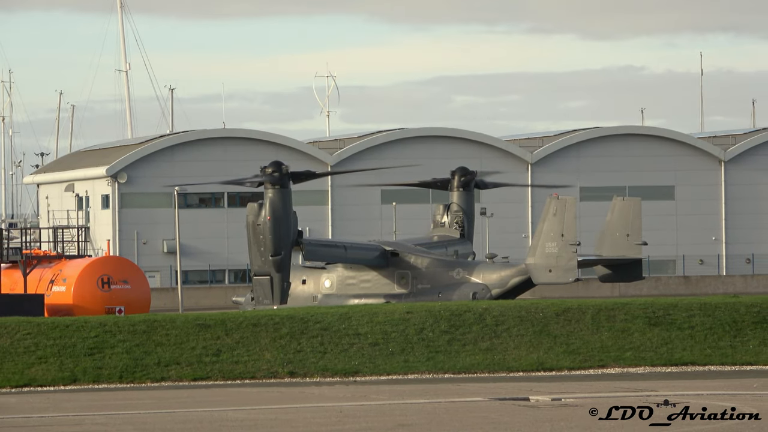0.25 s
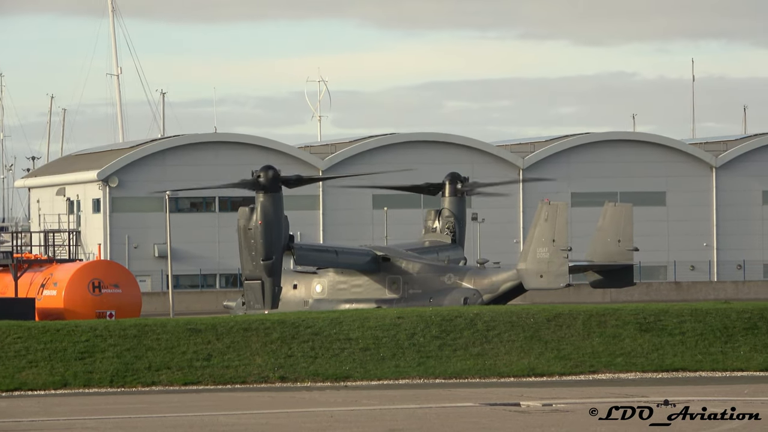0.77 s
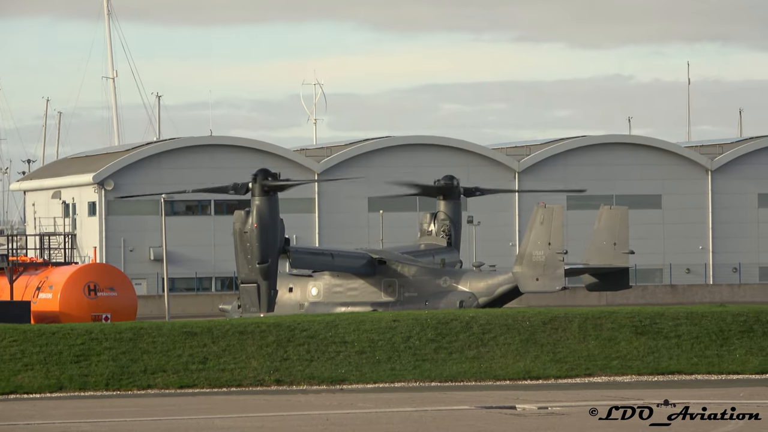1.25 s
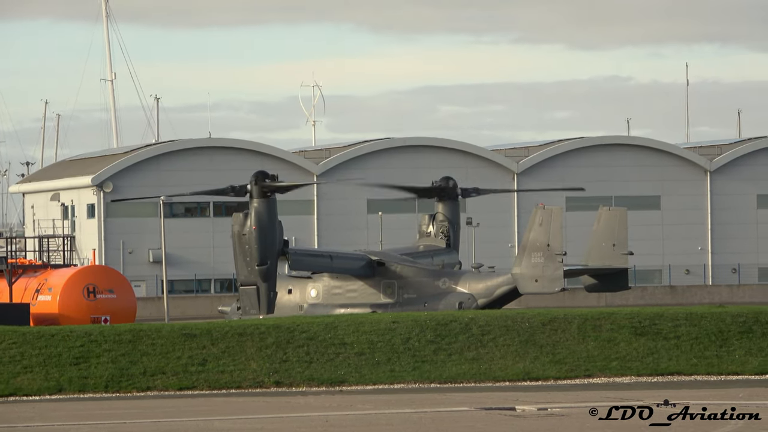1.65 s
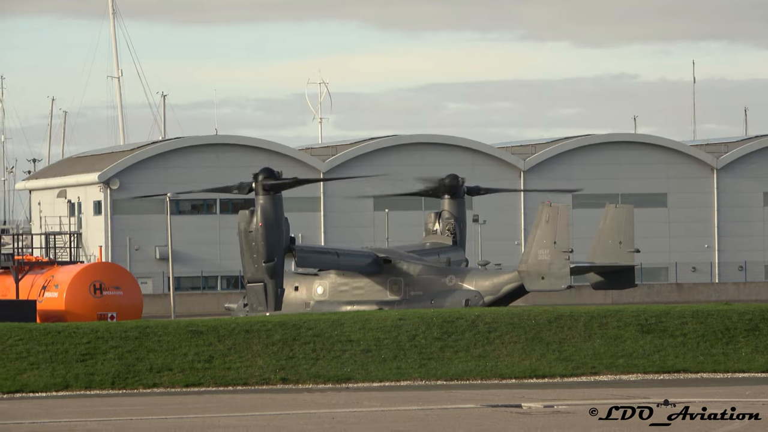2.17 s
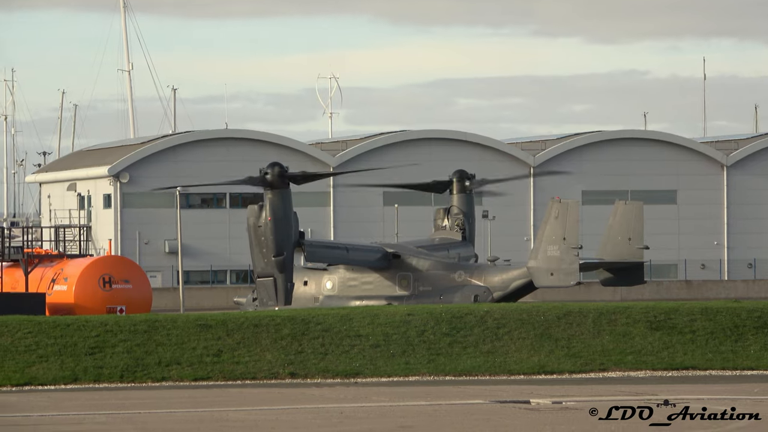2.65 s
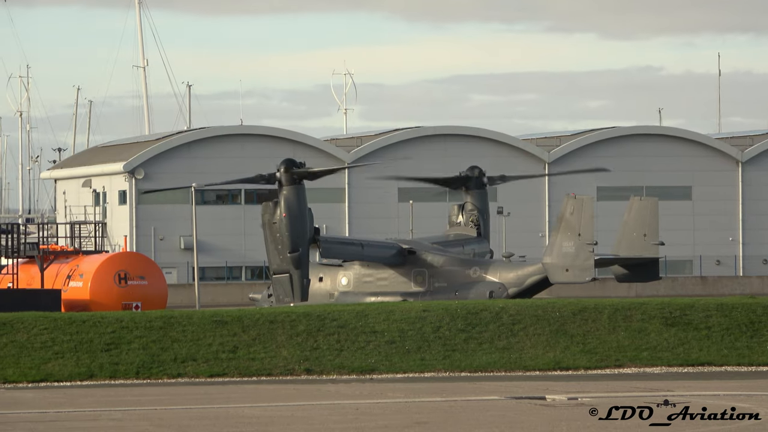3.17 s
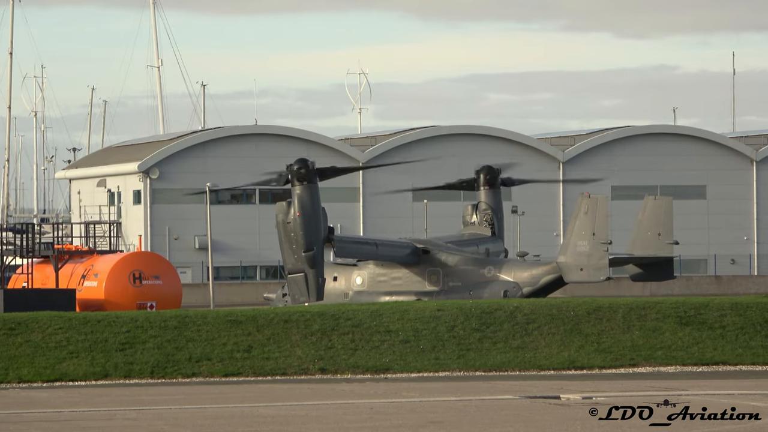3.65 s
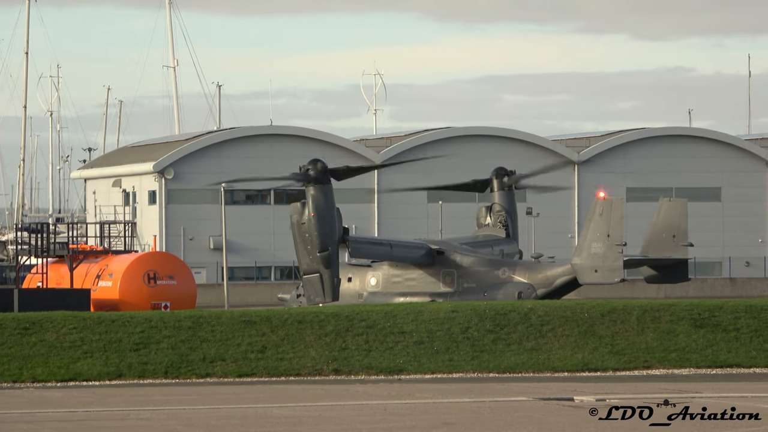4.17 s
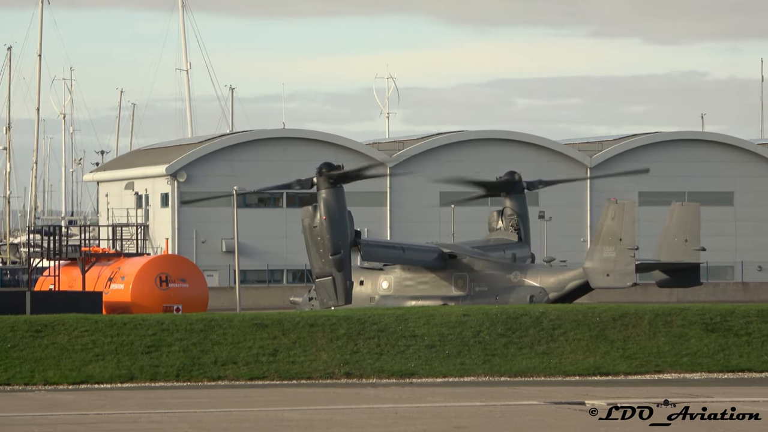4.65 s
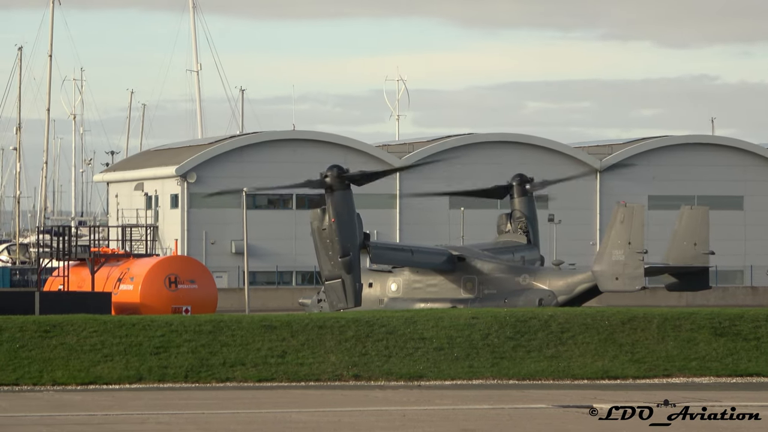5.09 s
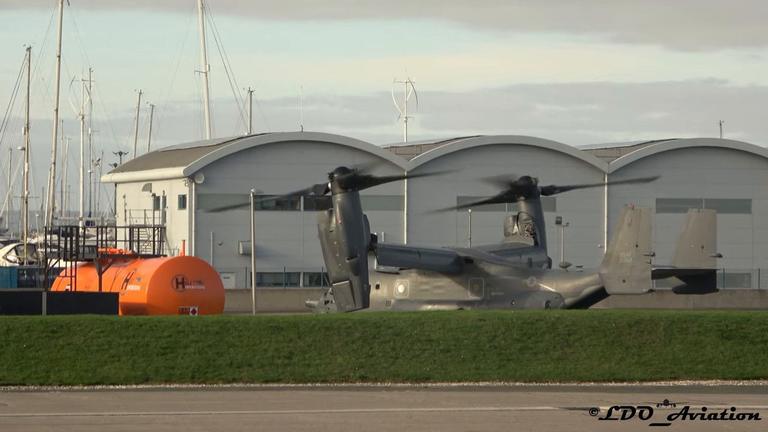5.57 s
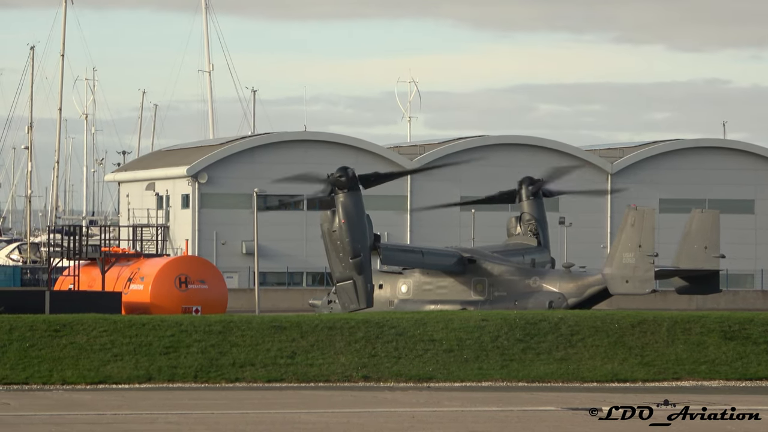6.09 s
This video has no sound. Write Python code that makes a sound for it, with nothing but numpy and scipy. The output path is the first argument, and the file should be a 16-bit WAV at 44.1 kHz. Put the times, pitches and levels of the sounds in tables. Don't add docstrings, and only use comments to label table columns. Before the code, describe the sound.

A tiltrotor idles on the ground outdoors, heard across grass for about six seconds without starting or stopping. Two rotors beat rapidly, about twenty slaps a second each, interleaved into a rough, fluttering chop with low thumps and a papery midrange edge. Beneath are a steady broad turbine roar and a faint, smeared high whine that pulses with the blades. Hard snaps stand out near 0.8 to 1 second, then strongly from 2.2 to 3.1, when the slapping is heaviest. From about 4 to 5 seconds the chop is softer, with a few snaps around 4.4. Around 5.4 to 5.8 sharp slaps return with short, bright tearing hisses. Low wind gusts buffet the microphone throughout, heaviest at 3.1 to 3.6 and 5.1 to 5.5, mostly left, with overloaded thuds. The aircraft stays nearly centred, with slight ground and building reflections.

```python
import sys
import numpy as np
from scipy import signal
from scipy.fft import rfft, irfft
from scipy.io import wavfile
from scipy.ndimage import uniform_filter1d

SR = 44100
rng = np.random.default_rng(int(sys.argv[2]) if len(sys.argv) > 2 else 0)


def put_to_file(sound):
    columns = np.atleast_2d(sound).T
    safe = np.clip(columns, -1, 1)
    whole_steps = np.round(safe * 32767)
    wavfile.write(sys.argv[1], SR, whole_steps.astype(np.int16))


def amplitude_ratio(level_db):
    exponent = np.asarray(level_db, float) / 20
    return 10 ** exponent


N = 278712
BLADE_HZ = 19.7
ROWS = N // 2000 + 2


def noise():
    return rng.standard_normal(N)


def curves(table):
    s, *columns = np.transpose(table)
    return [np.interp(np.arange(N) / SR, s, c) for c in columns]


def colour(x, points, unit=True):
    hz, db = np.transpose(points)
    f = np.arange(N // 2 + 1) * SR / N + 1
    gain = amplitude_ratio(np.interp(np.log(f), np.log(hz), db))
    y = irfft(rfft(x) * gain, N)
    return y / np.std(y) if unit else y


def walk(rate):
    k = int(SR / rate)
    held = np.repeat(rng.standard_normal(N // k + 1), k)
    y = uniform_filter1d(uniform_filter1d(held, k), k)[:N]
    return y / np.std(y)


def steady(x, over_ms, share):
    power = uniform_filter1d(x ** 2, int(over_ms * SR / 1000)) + .05
    y = x / power ** (np.clip(share, 0, 1) / 2)
    return y / np.std(y)


def burst(since_ms, rise_ms, fall_ms):
    return 2 / (np.exp(-since_ms / rise_ms) + np.exp(since_ms / fall_ms))


def wake(memory):
    rows = rng.standard_normal((ROWS, round(SR / BLADE_HZ)))
    return signal.lfilter([1], [1, -np.clip(memory, 0, .95)], rows, axis=0).ravel()[:N]


# (frequency [Hz], level [dB])
CHOP_TONE = [(300, -2), (500, -1), (750, 3.5), (1100, 1), (1500, -4), (2200, -59)]
CRACK_TONE = [(1000, -20), (1600, 13), (2500, 2.5), (4000, 1), (6500, -21), (9000, -34), (12000, -62)]
BODY_TONE = [(60, -31), (120, 13), (200, 5), (300, 12.5), (420, 6.5), (600, -15), (1000, -61)]
THUMP_TONE = [(10, -16), (25, -17), (60, -7.5), (85, 3), (100, -0.5), (140, -6), (180, -2), (230, -16.5),
              (400, -21.5), (800, -60), (2000, -88)]


def rotor(place_ms, slap_db, crack_db, body_db, thump_ms, thump_db):
    turns = np.arange(N) / SR * BLADE_HZ + .5
    blade = np.floor(turns - place_ms * BLADE_HZ / 1000).astype(int)
    since = 1000 * (turns - .5 - blade) / BLADE_HZ - place_ms
    late, size, bright, deep = rng.standard_normal((ROWS, 4))[blade].T

    rough = np.tanh(0.5 * colour(wake(memory=0.29), CHOP_TONE)) / .5
    slap = burst(since - 1.6 * late, rise_ms=4.34, fall_ms=2.64) * rough
    crack = burst(since - late, rise_ms=1.6, fall_ms=2.2) * colour(noise(), CRACK_TONE)
    crack = amplitude_ratio(crack_db + 0.58 * bright) * crack
    body = burst(since - 2.2, rise_ms=8.8, fall_ms=8.45) * colour(wake(memory=0.76), BODY_TONE)
    body = amplitude_ratio(body_db + 1.35 * deep + 2) * body

    pushes = np.diff(np.floor(turns - .5 - thump_ms * BLADE_HZ / 1000), prepend=0)
    thump = amplitude_ratio(thump_db + 0.58 * walk(rate=1.02)) * colour(pushes, THUMP_TONE)
    sound = amplitude_ratio(slap_db - 2) * (amplitude_ratio(0.77 * size) * (slap + crack) + body) + thump
    return sound, burst(since, rise_ms=3.6, fall_ms=2.3) * amplitude_ratio(2.9 * size)


# (time [s], slap level [dB], far rotor over near rotor [dB])
LOADING = [(0, -18, -9), (.4, -18, 8), (.8, -15, -9), (1.2, -18, -13), (1.45, -18, -6), (1.8, -16.5, -3),
           (2.05, -14.5, -5), (2.43, -17, -2), (2.65, -14, 20), (3.1, -18, 16), (3.45, -18, 4.5),
           (4.0, -19.5, 23), (4.3, -20.5, 3), (4.66, -23.5, 8), (4.9, -23.5, 5), (5.2, -22, 14),
           (5.8, -22.5, 2.5), (6.32, -20.5, -3)]
# (time [s], level [dB])
VORTEX_CRACK = [(0, -30), (.6, -25.5), (1.2, -30), (1.5, -38), (2.1, -27.5), (2.6, -21.5), (3, -21.5),
                (3.5, -26), (4.1, -25), (4.6, -22.5), (5.1, -31), (5.5, -23), (6.32, -29)]
# (time [s], level [dB])
THRUST_BODY = [(0, -19.5), (.7, -23), (1.3, -20), (1.65, -27.5), (2.25, -20.5), (2.6, -25.5), (3.05, -22),
               (3.6, -26.5), (4.1, -30), (4.45, -23), (5, -25), (5.6, -28), (6.15, -21.5), (6.32, -25)]


def loading():
    slap_db, far_over_db = curves(LOADING)
    near_db = slap_db - 10 * np.log10(1 + amplitude_ratio(far_over_db) ** 2)
    crack_db = curves(VORTEX_CRACK)[0] - slap_db
    body_db = curves(THRUST_BODY)[0] - slap_db
    return near_db, near_db + far_over_db, crack_db, body_db


# (time [s], peak level [dB])
HARD_SLAPS = [(0.768, -13.5), (0.867, -24), (0.969, -24), (1.069, -22), (1.527, -29), (1.577, -27),
              (1.677, -17), (1.83, -19), (2.086, -23), (2.19, -18.5), (2.238, -20), (2.288, -14),
              (2.388, -12.5), (2.49, -14), (2.905, -35), (2.957, -11), (3.057, -13), (3.41, -15),
              (3.673, -18.5), (3.721, -20), (3.827, -23), (4.378, -16), (4.429, -28), (5.087, -40),
              (5.247, -39), (5.448, -15.5), (5.499, -13), (5.545, -18), (5.65, -19.5), (5.8, -20)]
# (frequency [Hz], level [dB])
SNAP_TONE = [(300, -20), (600, -6.5), (1100, 9.5), (1800, -2.5), (3000, -4), (6000, -14), (9000, -45),
             (12000, -70)]


def hard_slaps():
    since = 1000 * np.arange(-200, 800) / SR
    swell = burst(since - 1.2, rise_ms=0.99, fall_ms=1.7)
    shape, spikes = np.zeros(N + 1000), np.zeros(N)
    for s, db in HARD_SLAPS:
        start = int(s * SR) - 200
        shape[start:start + 1000] += amplitude_ratio(db - 4.5) * swell
        spikes[int((s + .0012) * SR)] = amplitude_ratio(db - 32)
    ragged = shape[:N] * steady(colour(noise(), SNAP_TONE), over_ms=4, share=.7)
    spike = colour(signal.unit_impulse(N, "mid"), SNAP_TONE)[N // 2 - 300:N // 2 + 301]
    return ragged + signal.fftconvolve(spikes, spike / spike.max(), "same")


# (frequency [Hz], level [dB])
TIP_TONE = [(1500, -22), (3000, 4), (4500, 0), (6500, -3), (8500, -20), (11000, -34)]


def tip_tears():
    from_s, first_db, grow_db, count = 5.348, -24.5, 0.37, 9.8
    blade = np.arange(count)
    since = 1000 * (np.arange(N) / SR - from_s - blade[:, None] / BLADE_HZ)
    swells = burst(np.clip(since - 2.5, -60, 60), rise_ms=1.9, fall_ms=1.8)
    shape = amplitude_ratio(first_db - 6 + grow_db * blade) @ swells
    return shape * steady(colour(noise(), TIP_TONE), over_ms=4, share=.6)


# (time [s], roar level [dB], whine level [dB])
TURBINE_LEVELS = [(0, -35, -53), (.8, -34.5, -54), (1.3, -36, -48), (2.25, -37, -61), (2.6, -34.5, -47.5),
                  (3.3, -36.2, -49), (3.7, -38.5, -60), (4.1, -36.5, -49.5), (5.3, -38, -47),
                  (5.6, -39, -52.5), (6.32, -39.8, -50.5)]
# (frequency [Hz], level [dB])
ROAR_TONE = [(20, -30), (60, -10), (150, 2.5), (400, 11), (1000, 8.5), (2000, 1.5), (3500, 1.5),
             (5000, -0.5), (6500, -6), (8000, -11.5), (9500, -22.5), (11000, -28.5), (13000, -37)]


def turbines(chop):
    roar_db, whine_db = curves(TURBINE_LEVELS)
    roar = (1 + 0.27 * chop) * amplitude_ratio(0.38 * walk(rate=13)) * colour(noise(), ROAR_TONE)
    whine_hz, width_hz = 5960, 330
    edges = [whine_hz - width_hz / 2, whine_hz + width_hz / 2]
    whine = signal.sosfilt(signal.butter(2, edges, "band", fs=SR, output="sos"), noise())
    whine = (1 + 1.14 * chop) * amplitude_ratio(1.8 * walk(rate=15)) * whine / np.std(whine)
    return amplitude_ratio(roar_db + 7.5) * roar + amplitude_ratio(whine_db) * whine


def ground(x, lag_ms, share, rough_hz):
    f = np.arange(N // 2 + 1) * SR / N
    bounce = share * np.exp(-(f / rough_hz) ** 2 - 2j * np.pi * f * lag_ms / 1000)
    return irfft(rfft(x) * (1 + bounce), N) / np.sqrt(1 + share ** 2)


# (frequency [Hz], side level [dB])
SCATTER_TONE = [(150, -37), (300, -42), (450, -12.5), (800, -31), (1400, -22), (2500, -20.5), (5000, -16.5),
                (9000, -16)]


def hangars(mid):
    tails = rng.standard_normal((3, 2000)) * np.exp(-np.arange(2000) / (0.0084 * SR))
    tails = tails / np.linalg.norm(tails)
    paths = [walk(rate=5.5) * signal.fftconvolve(mid, tail)[:N] for tail in tails]
    return colour(sum(paths), SCATTER_TONE, unit=False)


# (time [s], left port level [dB], length [ms], right port under left [dB])
GUST_SWELLS = [(.05, -26, 41, 7), (.24, -20, 34, 2), (.36, -22.5, 31, 8), (.59, -20, 37, 7),
               (.79, -17, 53, 7), (.98, -19, 45, 5), (1.17, -17.5, 62, 7), (1.32, -14, 50, 2.5),
               (1.53, -14.5, 140, 5), (1.74, -17, 48, 3), (1.87, -13, 64, 7), (2.04, -18.5, 45, 5),
               (2.15, -18.5, 26, 4), (2.61, -19, 64, 2), (2.78, -20, 55, 2), (2.92, -13, 45, 8),
               (3.12, -8, 72, 7.5), (3.27, -9.5, 56, 4), (3.43, -10, 44, 3), (3.54, -8.5, 40, 7),
               (3.93, -12.5, 45, 12), (4.07, -13.5, 38, 5), (4.37, -14.5, 53, 6), (4.55, -22.5, 45, 5),
               (4.92, -21.5, 76, 3), (5.13, -12, 45, 9.5), (5.37, -10.5, 47, 5), (5.49, -7, 55, 7),
               (5.66, -18, 67, -1), (6.08, -17, 78, 6)]


def gusts():
    lull_db = -25, -33
    coarse = np.arange(0, N, 50)
    s, db, length_ms, lee_db = np.transpose(GUST_SWELLS)[:, :, None]
    since = np.clip(1000 * (coarse / SR - s) / length_ms, -30, 30)
    swell = burst(since, 0.98, 0.88) ** 2
    levels = []
    for lull, peak in zip(lull_db, (db, db - lee_db)):
        power = amplitude_ratio(lull) ** 2 + np.sum(amplitude_ratio(peak) ** 2 * swell, axis=0)
        levels.append(np.interp(np.arange(N), coarse, 10 * np.log10(power)))
    return np.array(levels)


# (frequency [Hz], level [dB])
BUFFET_TONE = [(3, -39), (10, -13), (18, -2.5), (30, 1), (60, -1), (90, -19), (130, -23), (200, -38),
               (1000, -89)]
SPRAY_TONE = [(40, -20), (70, -9), (88, -0.5), (105, -8), (125, -12), (170, -15.5), (240, -37), (400, -35),
              (1000, -83)]


def wind():
    gust_db = gusts()
    big, own = (steady(colour(noise(), BUFFET_TONE), over_ms=100, share=0.76) for _ in range(2))
    carried = np.interp(np.arange(N) - 0.0049 * SR, np.arange(N), big)
    small = np.array([colour(noise(), SPRAY_TONE) for _ in range(2)])
    flutter = amplitude_ratio(0.58 * np.array([walk(rate=8.7), walk(rate=11)]))
    eddies = np.array([big, 0.86 * carried + 0.41 * own])
    eddies = eddies + amplitude_ratio(0.11 * (gust_db + 11) - 8.5) * small
    push = amplitude_ratio(gust_db + 1.6) * flutter * eddies
    return 1.4 * np.tanh(push / 1.4)


# (time [s], near rotor [ms], far rotor [ms])
SLAP_PLACE = [(0, 7.9, 19.8), (1.7, 6.4, 17.2), (2.43, 7.2, 17.8), (2.9, 8.1, 15.8), (3.3, 7.8, 15.9),
              (4, 7.2, 19.3), (4.5, 7, 18.8), (5.68, 8.1, 19), (6.2, 7.1, 16.5)]
# (frequency [Hz], level
# [dB])
ROLLOFF_TONE = [(10000, 0), (12000, -3), (13500, -27), (16000, -42)]
HOUSING_TONE = [(700, 0), (850, -2.5), (1000, 2.5), (1200, 3), (1400, 0), (1550, -1), (1750, 4),
                (2050, 1.5), (2400, 3), (2600, -0.5), (3000, -1.5)]


def scene():
    near_ms, far_ms = curves(SLAP_PLACE)
    near_db, far_db, crack_db, body_db = loading()
    near, near_chop = rotor(near_ms, near_db, crack_db, body_db, thump_ms=5.3, thump_db=-29.5)
    far, far_chop = rotor(far_ms, far_db, crack_db, body_db, thump_ms=18.7, thump_db=-30.5)
    far = far + hard_slaps() + tip_tears()
    engines = turbines(near_chop + far_chop)

    mid = ground(near, lag_ms=3.106, share=0.46, rough_hz=2800)
    mid = mid + ground(far, lag_ms=2.92, share=0.29, rough_hz=2200)
    mid = mid + ground(engines, lag_ms=2.86, share=0.24, rough_hz=1950)
    mid = colour(colour(mid, ROLLOFF_TONE, unit=False), HOUSING_TONE, unit=False)
    side = hangars(mid)
    return np.array([mid + side, mid - side]) + wind()


def roll_off(x):
    return signal.sosfilt(signal.butter(12, 15700, fs=SR, output="sos"), x)


def record(dry):
    hiss = amplitude_ratio(-100) * rng.standard_normal(dry.shape)
    from_end = np.minimum(np.arange(N), np.arange(N)[::-1])
    ends = np.minimum(from_end / 60 + .3, 1)
    rounded = ends * 1.5 * np.tanh(dry / 1.5)
    return roll_off(np.clip(rounded + hiss, -1, 1))


dry = scene()
out = record(dry)
put_to_file(out)
```